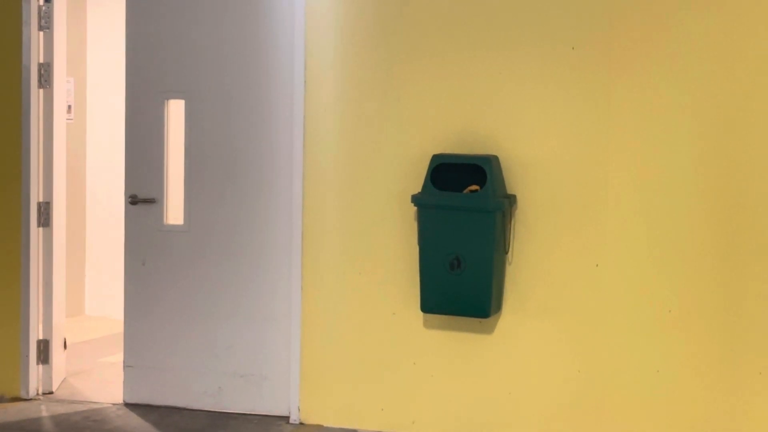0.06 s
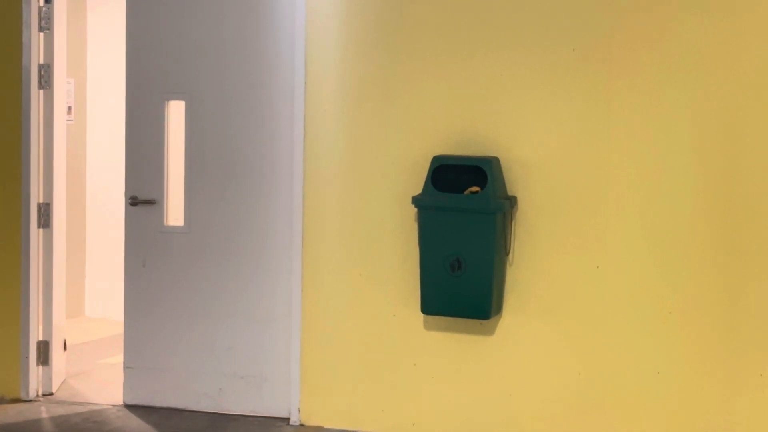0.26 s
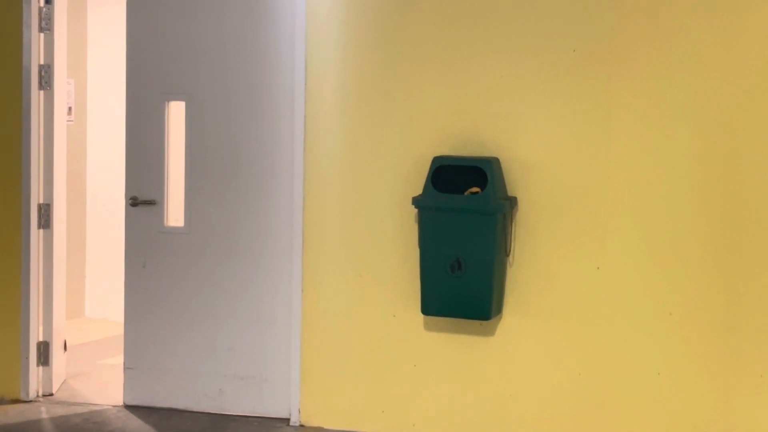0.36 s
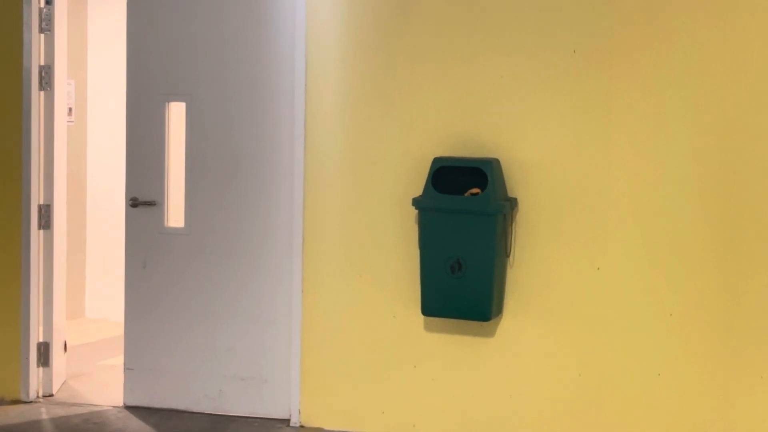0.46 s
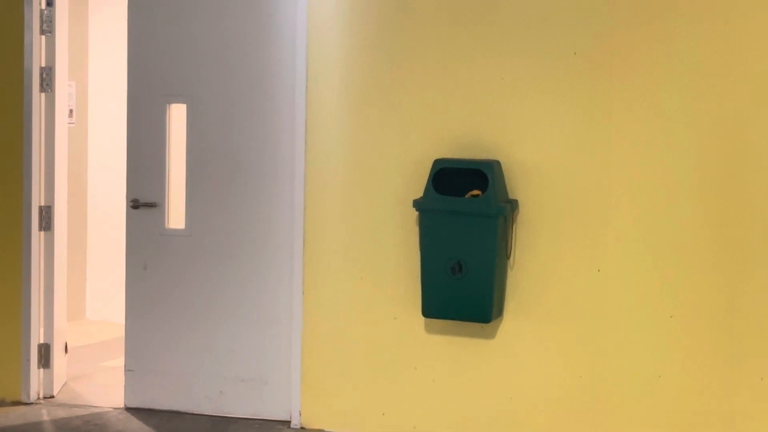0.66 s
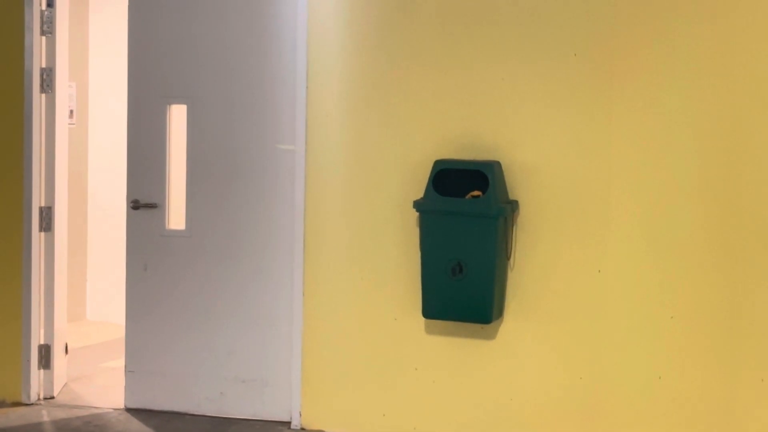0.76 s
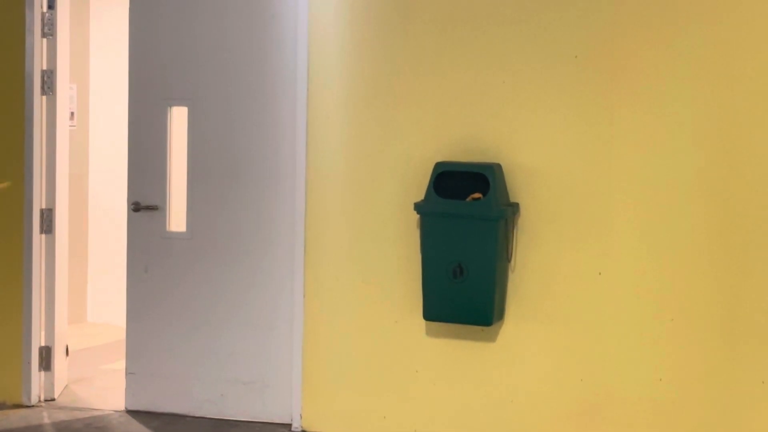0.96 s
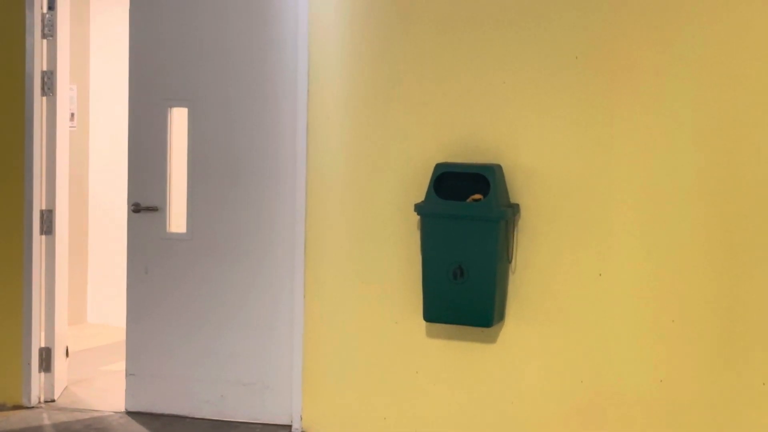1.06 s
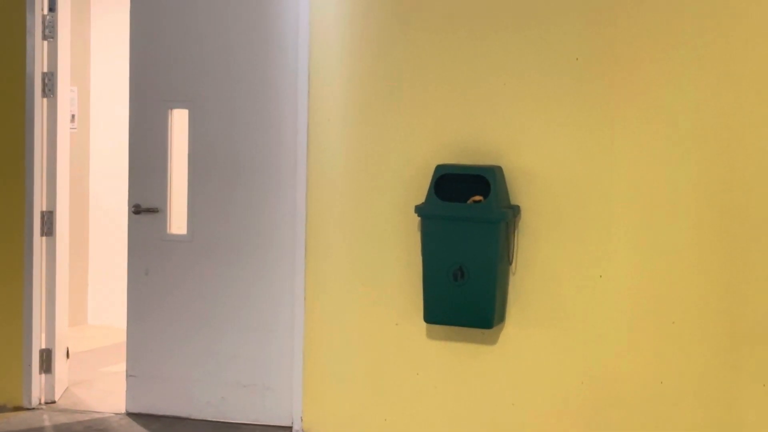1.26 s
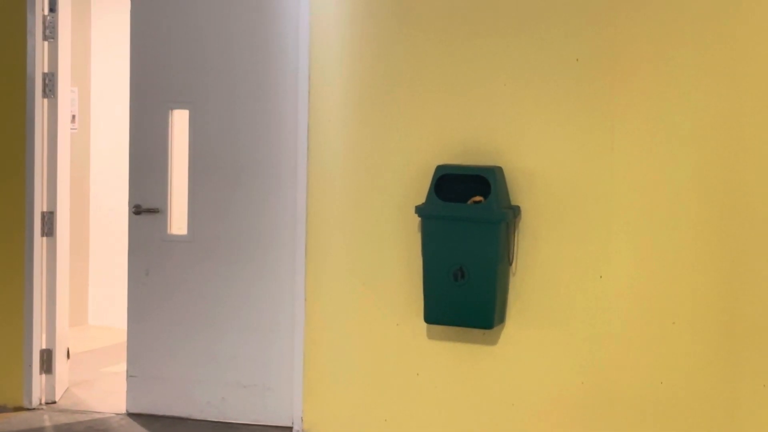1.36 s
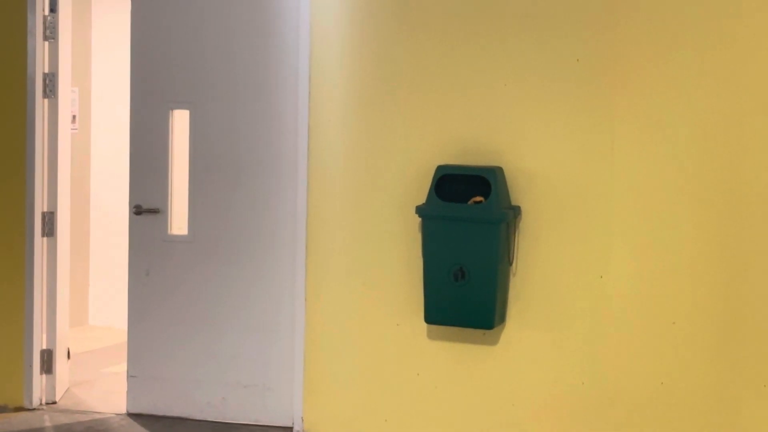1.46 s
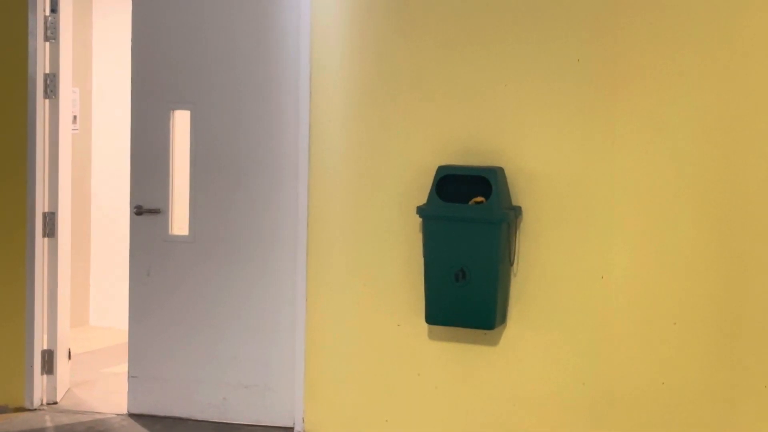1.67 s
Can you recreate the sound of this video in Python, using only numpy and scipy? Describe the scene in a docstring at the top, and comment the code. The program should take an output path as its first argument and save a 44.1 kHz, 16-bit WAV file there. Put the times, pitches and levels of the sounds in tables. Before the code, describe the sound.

A toy blaster fires with a rush of air, and its dart cracks loudly against a plastic bin, with a quick second knock. The hard hall rings on, and two softer hisses follow over low ventilation rumble.

```python
"""A hard, echoing hall, heard through a two-port microphone. A toy blaster fires with a rush of air.
The dart cracks against a plastic bin on the wall; the shell booms in its modes and knocks once more.
The near walls answer first, then the whole hall rings on.
Two softer puffs of hiss follow, over the rumble of ventilation."""
import sys
import numpy as np
from scipy import signal
from scipy.fft import rfft, irfft
from scipy.io import wavfile

SR = 44100
rng = np.random.default_rng(int(sys.argv[2]) if len(sys.argv) > 2 else 0)


def master(y):
    """Save y as 16-bit WAV."""
    cut = np.clip(np.atleast_2d(y).T, -1, 1)
    pcm = np.round(cut * 32767)  # scale
    wavfile.write(sys.argv[1], SR, pcm.astype(np.int16))


N = 74970
T, FREQS = np.arange(N) / SR, np.fft.rfftfreq(2 * N, 1 / SR)

# blows on the bin: t/s, crack and clatter gain/dB, shell gain/dB
BIN_BLOWS = [(.6189, 2, 5.5), (0.6936, -11, 3.5)]
# direct crack and its reflections off the nearest surfaces: delay/s, gain
CRACK_PATHS = [(0, .9), (.00125, 1), (.0036, .36), (.0048, .25), (.0064, .22), (.0155, .22), (.0215, .2)]
# colour of the crack: f/Hz, gain/dB
CRACK_COLOUR = [(150, -15), (700, 5), (1300, 11), (1900, 9), (2400, 13), (3400, 15), (3900, 11), (4500, 0),
                (5300, 4), (6300, 4), (10000, -9), (15500, -13)]
# modes of the bin's shell: f/Hz, relative level/dB, t60/s
SHELL_MODES = [(126, -36, 0.29), (244.6, -28.5, 0.4), (356.6, -19, 0.32), (555, -28, 0.48),
               (649, -31.5, 0.52), (699, -24, 0.16), (757.4, -10.5, 0.062), (916, -23, 0.36),
               (1070, -37.5, 0.59), (1175, -23, 0.12), (1386, -32, 0.3), (1500, -43, 0.28)]
# clatter of the plastic and the near walls: f/Hz, relative level/dB, t60/s
CLATTER_BANDS = [(50.6, -6, 0.2), (145.6, 20, 0.87), (210, 6.5, 0.71), (372, 19.5, 0.43), (504, 7.5, 0.38),
                 (760, 13, 0.54), (1320, 10.5, 0.36), (2380, 2.5, 0.42), (3780, 4, 0.44), (4070, -7, 0.64),
                 (6040, 4.5, 0.2), (10400, -0.5, 0.36), (11840, -11, 0.23), (15500, -9, 0.28)]
# colour of the blow as the whole hall returns it: f/Hz, relative level/dB
WASH_COLOUR = [(60, -11), (140, 3), (220, 8.5), (290, 7), (355, 24.5), (420, 13.5), (555, 15.5), (630, 9),
               (765, 19.5), (840, 9.5), (915, 17.5), (1020, 10.5), (1600, 7.5), (3500, 6), (4400, -1.5),
               (6500, 0.5), (10000, 5), (12000, -13.5), (15500, -19)]
# rushes of air: t/s, rise/s, hold/s, gain/dB, treble tilt/(dB per octave), barrel lift/dB
AIR_PUFFS = [(0.172, .042, 0.053, -28, 0, -1.5), (1.191, .04, 0.072, -38, -3.5, 12),
             (1.556, .05, 0.09, -38.5, -6, 1)]
# colour of the air: f/Hz, relative level/dB
AIR_COLOUR = [(35, -22), (75, 8.5), (130, 20.5), (200, 5), (340, 13.5), (500, -2), (900, 4), (2000, 0.5),
              (4800, -1), (6600, 3.5), (10300, 5), (12000, -13), (15500, -19)]
# resonances of the blaster: f/Hz, half-width/Hz, share of the lift
BARREL_RESONANCES = [(3700, 190, 0.88), (4926, 204, 0.78), (6260, 200, 0.38)]
# reverberation of the hall: f/Hz, t60/s
HALL_DECAY = [(100, 3), (400, 4.2), (900, 3.8), (2000, 3), (4000, 2.3), (6500, 1.75), (10000, 1.15),
              (15000, .9)]
# ventilation spectrum: f/Hz, relative level/dB
VENT_COLOUR = [(15, -44), (28, -20), (52, 6.5), (66, -8.5), (80, 1.5), (100, -7.5), (135, 4), (190, -5),
               (320, -8), (450, -17), (900, -20), (2000, -29.5), (4000, -38), (6300, -36.5), (10000, -51.5),
               (16000, -89)]
# likeness of diffuse sound at the two microphone ports: f/Hz, correlation
PORT_LIKENESS = [(50, .99), (250, .9), (550, .66), (1000, .74), (2000, .94), (10000, .9)]
# balance of the ports: f/Hz, left minus right/dB
PORT_BALANCE = [(30, .6), (130, 1.1), (1000, 2.8), (2000, 0), (12000, 0.17)]
# phase between the ports: f/Hz, left lead/rad
PORT_PHASE = [(30, 0), (900, .15), (1700, -.15), (3300, .3), (4700, 0), (6700, .1), (7400, 1.2), (7700, 3),
              (8500, 3.2), (9130, 2.1), (10000, 1.4), (11100, .4), (13000, -.5), (15500, -1.6)]


def dart():
    """Each blow on the bin cracks, clatters, stirs the hall and sets the shell ringing."""
    ring = shell()
    out = np.zeros((2, N))
    for start, crack_db, shell_db in BIN_BLOWS:
        impact = crack() + clatter() + wash()
        out += delay(amp(crack_db) * impact + amp(shell_db) * ring, start)
    return out


def crack(crunch_db=-20.5, crunch_s=.0022):
    """The tip lands: one sharp pulse, repeated by the nearest surfaces, as the foam crumples behind it."""
    paths = sum(gain * np.exp(-2j * np.pi * FREQS * lag) for lag, gain in CRACK_PATHS)
    pulses = irfft(paths)[:N]
    crunch = amp(crunch_db) * diffuse() * np.exp(-T / crunch_s)
    return shape(pulses + crunch, causal(read(CRACK_COLOUR, FREQS)))


def shell(rise_cycles=5.1, spread_rad=.7):
    """The hollow bin booms in its modes, the lowest swelling last; each reaches the ports out of step."""
    out = np.zeros((2, N))
    for hz, db, t60 in SHELL_MODES:
        port_phase = spread_rad * rng.choice([-1, 1]) * np.array([[.5], [-.5]])
        swell = 1 - np.exp(-T * hz / rise_cycles)
        fade = 1e-3 ** (T / t60)
        out += amp(db) * swell * fade * np.sin(2 * np.pi * hz * T + port_phase)
    return out


def clatter(gain_db=-18, rise_s=.0028):
    """Crowded short resonances of the plastic and the near walls."""
    ringing = dying(CLATTER_BANDS, t60_column=2) * (1 - np.exp(-T / rise_s))
    return shape(ringing, causal(gain_db + read(CLATTER_BANDS, FREQS)))


def wash(gain_db=-28, rise_s=.023):
    """From farther off, the whole hall returns the blow as a slow wash."""
    tail = dying(HALL_DECAY) * (1 - np.exp(-T / rise_s))
    return shape(tail, causal(gain_db + read(WASH_COLOUR, FREQS)))


def air(leak=.14, release_s=.058, rasp_db=2.5, grain_s=.002, direct_db=-2, hall_db=.5):
    """Each rush of air starts with a leak, swells with a slight rasp, shuts off and fills the hall."""
    direct = np.zeros((2, N))
    treble_octaves = np.log2(np.maximum(FREQS / 3000, 1))
    barrel = sum(share / (1 + ((FREQS - hz) / width) ** 2) for hz, width, share in BARREL_RESONANCES)
    for start, rise, hold, db, tilt_db, lift_db in AIR_PUFFS:
        age = T - start
        opening = (age > 0) * (leak + (1 - leak) * np.clip(age / rise, 0, 1) ** 2)
        closing = np.exp(-np.maximum(age - rise - hold, 0) / release_s)
        rasp = amp(rasp_db * np.interp(T / grain_s, np.arange(N), rng.standard_normal(N)))
        colour_db = db + read(AIR_COLOUR, FREQS) + tilt_db * treble_octaves + lift_db * barrel
        direct += shape(diffuse() * opening * closing * rasp, causal(colour_db))
    return amp(direct_db) * direct + amp(hall_db) * hall(direct[0])


def hall(x):
    """The hall's long reverberation of x, from a tail of unit energy per port."""
    tail = dying(HALL_DECAY)
    return shape(x, rfft(tail, 2 * N)) / np.sqrt(np.sum(tail ** 2) / 2)


def ventilation(gain_db=-37.5):
    """Room tone: a steady low rumble with a little hiss, from all around."""
    noise = shape(diffuse(), amp(read(VENT_COLOUR, FREQS)))
    return amp(gain_db) * noise / noise.std()


def diffuse():
    """White noise reaching the microphone from all sides, partly alike at the two ports."""
    common, apart = rng.standard_normal((2, N))
    likeness = read(PORT_LIKENESS, FREQS)
    mid = shape(common, np.sqrt((1 + likeness) / 2))
    side = shape(apart, np.sqrt((1 - likeness) / 2))
    return np.array([mid + side, mid - side])


def dying(table, t60_column=1, bloom_cycles=2.6):
    """Diffuse noise in which each band builds up and dies at its own speed."""
    hz, t, bands = signal.stft(diffuse(), SR, nperseg=512)
    fade = 1e-3 ** (t / read(table, hz, t60_column)[:, None])
    cycles = np.outer(hz, t + t[1] / 2)
    bloom = 1 - np.exp(-(cycles / bloom_cycles) ** 2)
    return signal.istft(bands * fade * bloom, SR, nperseg=512)[1][:, :N]


def amp(db):
    """Decibels to gain."""
    return 10 ** (np.asarray(db) / 20)


def read(points, hz, column=1):
    """One column of a table, interpolated over log frequency."""
    table = np.array(points)
    return np.interp(np.log(hz + 1), np.log(table[:, 0] + 1), table[:, column])


def shape(x, gain):
    """Filters x by a gain at each frequency."""
    return irfft(rfft(x, 2 * N) * gain)[..., :N]


def causal(db):
    """A minimum-phase response of these levels: it never sounds ahead of its cause."""
    log_gain = np.log(amp(db))
    mirrored = np.r_[log_gain, log_gain[-2:0:-1]]
    return np.exp(np.conj(signal.hilbert(mirrored)))[:N + 1]


def delay(x, seconds):
    """The same sound, later."""
    count = round(seconds * SR)
    return np.concatenate([np.zeros_like(x[..., :count]), x[..., :N - count]], -1)


def scene():
    """Rushes of air, blows on the bin and room tone, as they reach the microphone."""
    return air() + dart() + ventilation()


def record(dry, notch_hz=8200, notch_width_hz=410, notch_db=-38, edge_hz=15750):
    """The microphone's ports differ in level and phase; they share a deep treble notch and a band limit."""
    sides = [.5, -.5]  # left, right
    balance = amp(np.outer(sides, read(PORT_BALANCE, FREQS)))
    phase = np.exp(1j * np.outer(sides, read(PORT_PHASE, FREQS)))
    notch = causal(notch_db * np.exp(-((FREQS - notch_hz) / notch_width_hz) ** 2))
    lowpass = signal.firwin(255, edge_hz, window=("kaiser", 9), fs=SR)
    return signal.oaconvolve(shape(dry, balance * phase * notch), lowpass[None], "same")


dry = scene()
out = record(dry)
master(out)
```